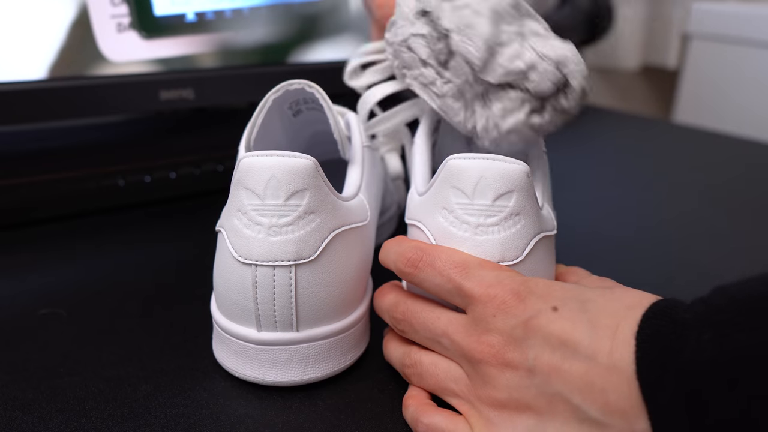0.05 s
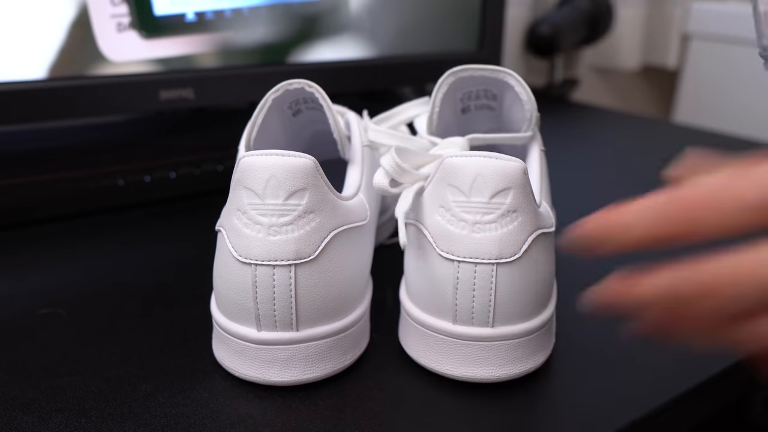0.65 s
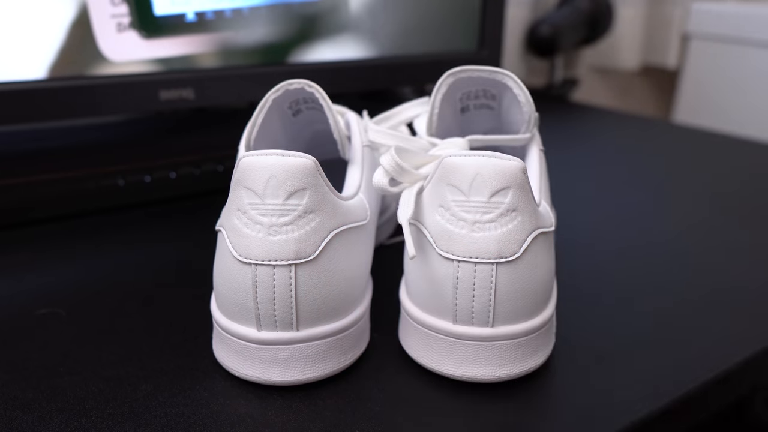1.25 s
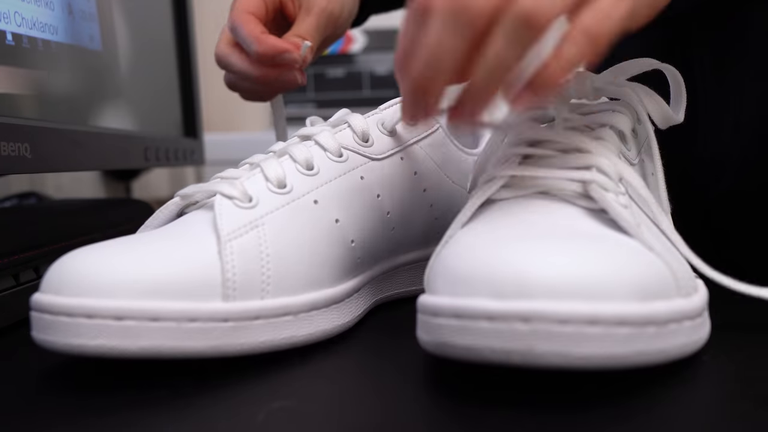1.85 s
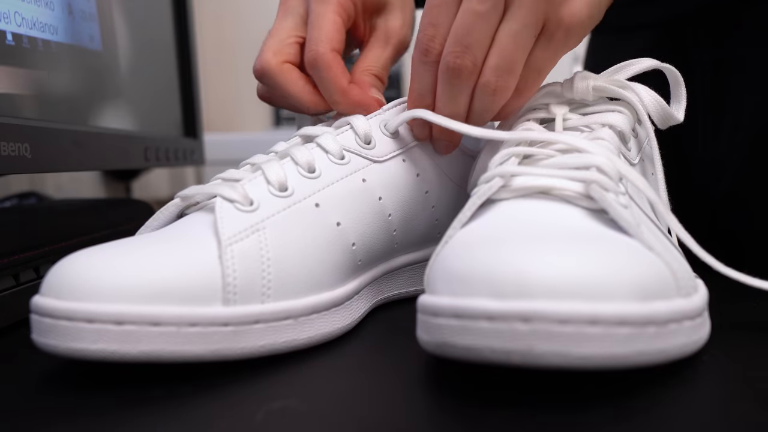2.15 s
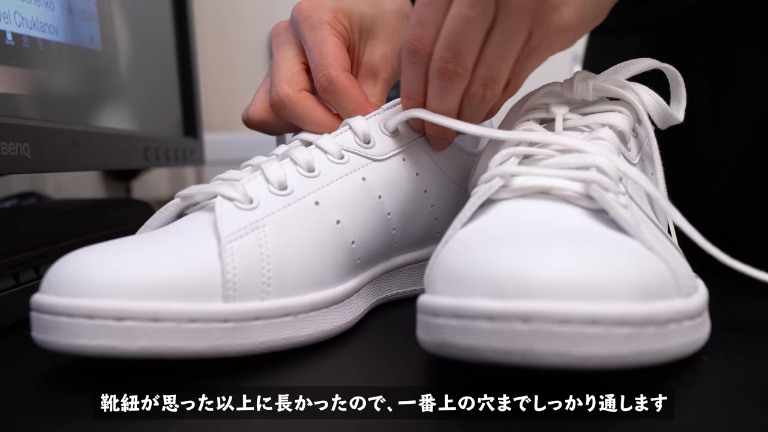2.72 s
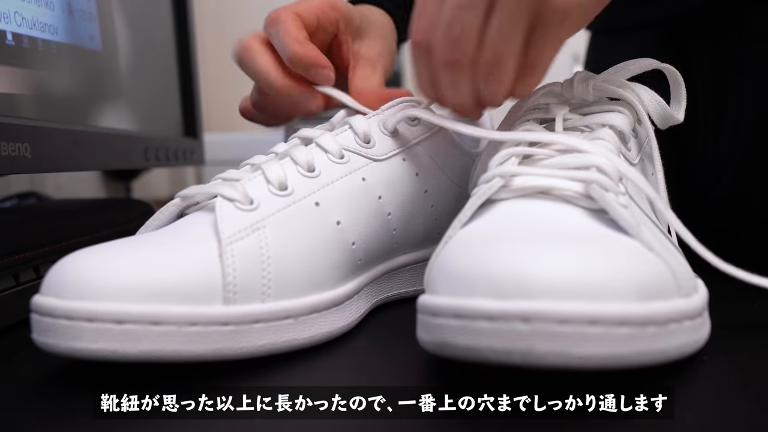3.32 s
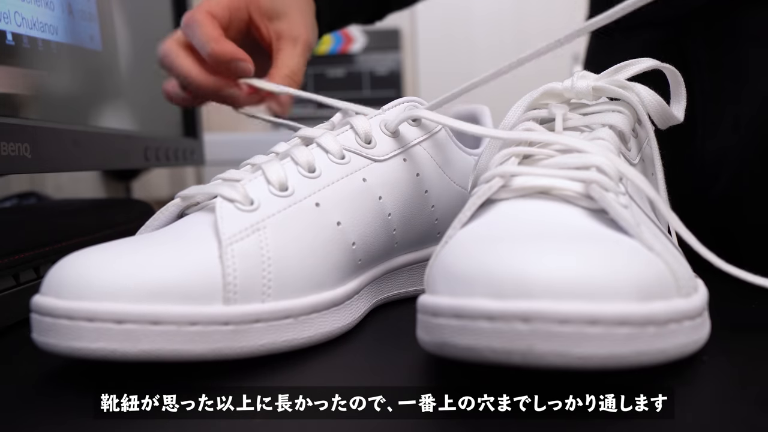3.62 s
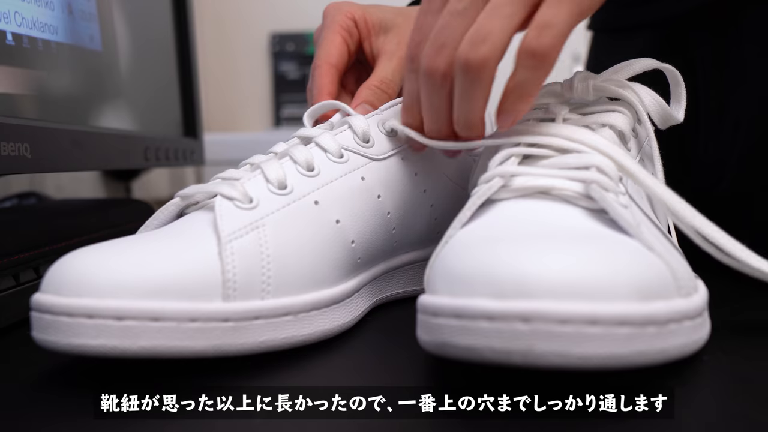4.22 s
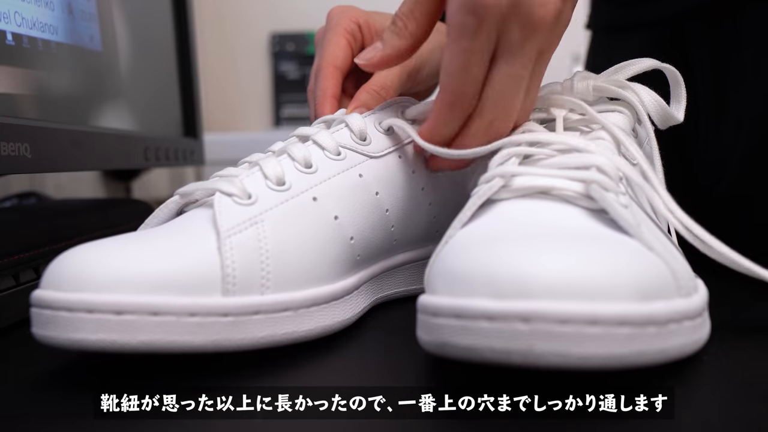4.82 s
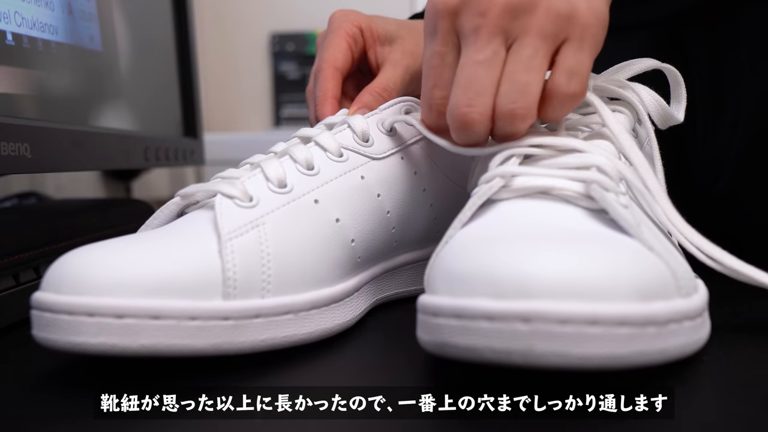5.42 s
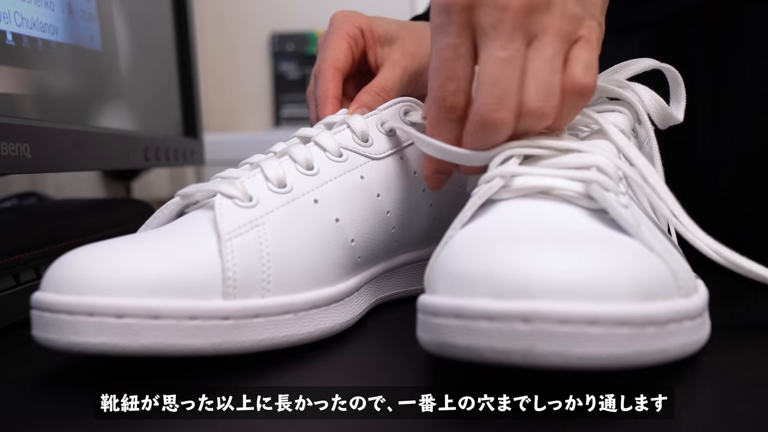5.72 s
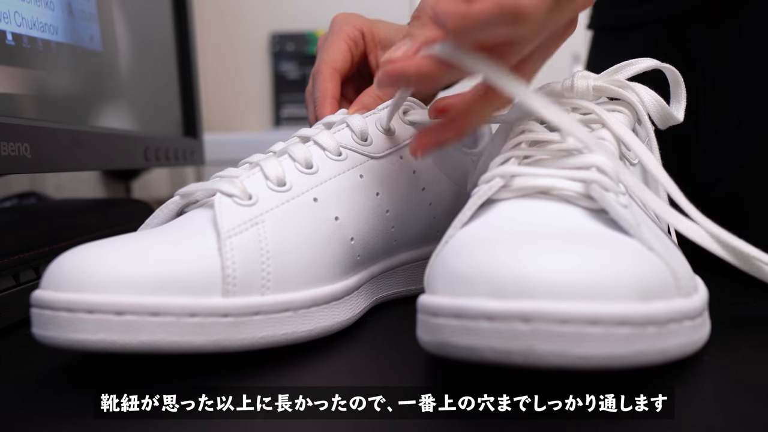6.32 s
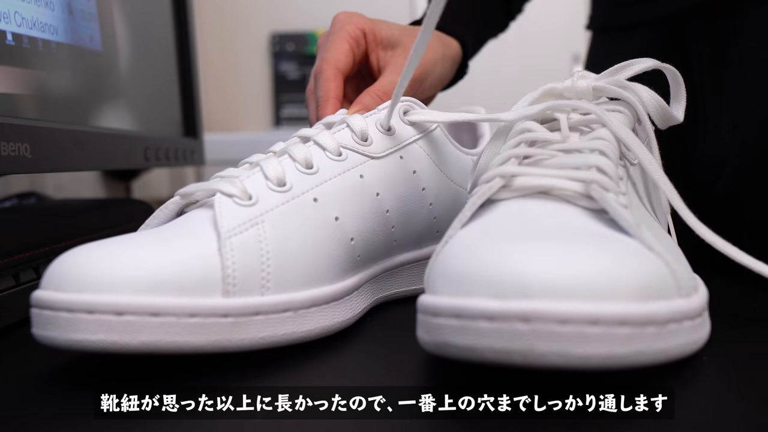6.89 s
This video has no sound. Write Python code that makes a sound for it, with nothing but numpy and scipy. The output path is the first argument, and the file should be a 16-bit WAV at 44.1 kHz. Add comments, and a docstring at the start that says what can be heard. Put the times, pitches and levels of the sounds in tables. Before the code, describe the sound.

Stuffing paper crackles out of a leather shoe, then a lace rasps through eyelets with small taps and low desk thuds.

```python
"""A cotton lace is threaded through a new leather shoe, close to a microphone on a desk.
First, crumpled stuffing paper is pulled out and scrunched, and its creases crackle. Then the lace rubs
on the leather and rasps through the eyelets (the lace holes). Its hard tip and the fingers tap on the
hollow shoe, and the hands make the desk sway and thud. A quiet room hums behind it all."""
import sys
import numpy as np
from scipy import signal
from scipy.fft import rfft, irfft
from scipy.io import wavfile
from scipy.ndimage import uniform_filter1d

SR = 44100
rng = np.random.default_rng(int(sys.argv[2]) if len(sys.argv) > 2 else 0)


def master_out(mix):
    """Clip the mix to full scale and print it as 16-bit PCM to the path in sys.argv[1]."""
    frames = np.transpose(np.atleast_2d(mix))
    ceiling = np.clip(frames, -1, 1)
    pcm = np.round(ceiling * 32767).astype(np.int16)
    wavfile.write(sys.argv[1], SR, pcm)


N = 315315

# the bright tone of a tiny click, for paper snaps and taps: (frequency [Hz], relative level [dB])
TICK_TONE = [(2500, -28), (5500, 14.5), (10000, 10.5), (16000, 0.5)]


def undb(db):
    """Turn decibels into a number to multiply by."""
    return 10 ** (np.asarray(db) / 20)


def unit(x):
    """Scale a signal so that its average size (rms) is 1."""
    return x / np.sqrt(np.mean(x ** 2))


def curves(table):
    """Join a table's timed points with straight lines: one curve for each column after the time."""
    times, *columns = np.transpose(table)
    return [np.interp(np.arange(N) / SR, times, column) for column in columns]


def noise():
    """White noise: an even hiss."""
    return rng.standard_normal(N)


def drift(rate, size=8192):
    """A smooth random wobble of about size 1 that heads for a new value `rate` times a second."""
    hold = max(int(SR / rate), 1)
    steps = np.repeat(np.resize(rng.standard_normal(size), N // hold + 1), hold)
    return unit(uniform_filter1d(steps, hold)[:N])


def colour(x, tone, size=1024):
    """Shape a sound's lows and highs to follow a list of (frequency [Hz], level [dB]) points."""
    hz, db = np.transpose(tone)
    grid_hz = np.maximum(np.arange(size // 2 + 1) * SR / size, 1)
    gains = undb(np.interp(np.log(grid_hz), np.log(hz), db))
    # build the filter so that nothing sounds ahead of the click that causes it
    cepstrum = irfft(np.log(gains))
    cepstrum[1:size // 2] *= 2
    cepstrum[size // 2 + 1:] = 0
    return signal.fftconvolve(x, irfft(np.exp(rfft(cepstrum))))[:len(x)]


def resonate(x, hz, width):
    """Ring at one pitch; a smaller width (in Hz) rings longer."""
    return signal.lfilter(*signal.iirpeak(hz, hz / width, fs=SR), x)


def resonate_twice(x, hz, width):
    """Ring twice over, so that less gets through away from the pitch."""
    return resonate(resonate(x, hz, width), hz, width)


def ring(x, modes):
    """An object rings at several pitches of its own, called modes."""
    return sum(undb(db) * resonate(x, hz, width) for hz, width, db in modes)


def band(x, lo_hz, hi_hz):
    """Keep the frequencies between two edges."""
    return signal.sosfilt(signal.butter(2, [lo_hz, hi_hz], "band", fs=SR, output="sos"), x)


def grains(rate, spread_db):
    """Tiny clicks, about `rate` a second: many small ones and a few large."""
    sizes = undb(spread_db * np.minimum(rng.exponential(size=N), 6))
    return unit((rng.random(N) < rate / SR) * sizes * rng.choice([-1, 1], N))


def strokes(table, attack_s, release_s, rest_db):
    """A loudness curve per level column: each stroke rises, holds and fades; brief ones do so faster."""
    t = np.arange(0, N + 64, 64) / SR
    power = np.outer(undb(rest_db) ** 2, np.ones(len(t)))
    for start, end, *db in table:
        length = max(end - start, .005)
        rise = np.clip((t - start) / min(attack_s, .7 * length), 0, 1)
        fall = np.exp(-np.maximum(t - end, 0) / min(release_s, length / 2))
        power = power + np.outer(undb(db), rise * fall) ** 2
    return [np.interp(np.arange(N) / SR, t, np.sqrt(p)) for p in power]


def contact(scuff_ms, size=4096):
    """Two surfaces touch: a burst of tiny slips dies away, with a faint rustle after it."""
    ms = np.arange(size) * 1000 / SR
    fade = np.exp(-ms / max(scuff_ms, .1)) + 0.019 * np.exp(-ms / 6.0)
    return rng.choice([-1, 1], size) * fade


def hit_level(x, db):
    """Scale a hit so that its first 10 ms have the given level."""
    return x * undb(db) / np.std(x[:SR // 100])


def paper(stop_s=1.341):
    """Creases buckle in dense showers while the sheets slide over each other; the sound stops short."""
    # grips, pulls and scrunches: (start [s], end [s], rustle [dB], crackle [dB])
    scrunches = [(-.03, .04, -31.5, -39.5), (.03, .13, -35, -40), (.225, .3, -32, -33.5),
                 (.43, .54, -37.5, -43), (.115, .225, -26.5, -30.5), (.29, .435, -25.5, -29.5),
                 (.525, .635, -31, -36.5), (.74, .93, -41, -44.5), (.813, .834, -30, -25),
                 (.845, .864, -26.5, -47), (.92, 1.13, -27, -31), (1.12, 1.335, -29, -34.5)]
    # the tones of the rustle and of the high crackle: (frequency [Hz], relative level [dB])
    rustle_tone = [(180, -19.5), (330, -5.5), (800, -2.5), (1400, 2), (1950, -4), (2700, -0.5),
                   (5000, -2.5), (7000, -17.5), (11000, -45)]
    crackle_tone = [(3500, -36), (6500, 2.5), (8500, 2), (13000, 2.5), (16000, -7)]
    # single creases that snap: (time [s], level [dB])
    snaps = [(0.0345, -33.5), (.2945, -33), (.298, -34), (.309, -31), (0.353, -35), (0.523, -32.5),
             (0.5643, -28), (.801, -36), (.951, -31), (.9855, -32.5), (1.0762, -25)]
    rustle_gain, crackle_gain = strokes(scrunches, attack_s=0.024, release_s=0.023, rest_db=(-47, -52))
    # large folds click from low to high; small flat patches each rattle at a pitch of their own
    folds = grains(rate=2200, spread_db=3.0) * undb(1.6 * drift(rate=120))
    patch_hz = np.geomspace(350, 14000, 9)
    patches = sum(resonate(noise() * undb(2.8 * drift(rate=110)), hz, hz / 3) for hz in patch_hz)
    creases = unit(0.82 * folds + unit(patches))
    sound = unit(colour(creases, rustle_tone)) * rustle_gain
    sound += unit(colour(creases, crackle_tone)) * crackle_gain
    for s, db in snaps:
        snap = colour(contact(scuff_ms=0.26), TICK_TONE)
        i = int(s * SR)
        sound[i:i + len(snap)] += hit_level(snap, db)
    return sound * np.clip((stop_s - np.arange(N) / SR) / 0.0047, 0, 1)


def room(air_db):
    """Soft ventilation noise and a low hum."""
    # the tone of the moving air: (frequency [Hz], relative level [dB])
    air_tone = [(25, 12.5), (70, 1.5), (120, -5), (250, 0), (500, -7.5), (760, -9), (1000, -7),
                (1350, -12.5), (2000, -17), (4000, -30), (8000, -31), (13000, -38), (16000, -63)]
    # the steady notes of the hum: (pitch [Hz], level [dB])
    hum_notes = [(49.3, -38), (99, -51)]
    t = np.arange(N) / SR
    hum = sum(np.sqrt(2) * undb(db) * np.sin(2 * np.pi * (hz * t + rng.random())) for hz, db in hum_notes)
    air = unit(colour(noise(), air_tone, size=4096))
    return air * undb(air_db + .5 * drift(rate=6.9)) + hum


def echo(x, fade_s, level_db):
    """The short echo of a small furnished room; it falls by 60 dB in `fade_s`."""
    # the tone of the echo: (frequency [Hz], relative level [dB])
    echo_tone = [(100, -38), (400, 4.5), (1200, 7.5), (4000, 5), (16000, 6.5)]
    t = np.arange(SR // 2) / SR
    reflections = noise()[:len(t)] * np.exp(-np.log(1000) * t / fade_s) * np.clip(t / 0.006, 0, 1)
    tail = colour(reflections, echo_tone)
    return signal.fftconvolve(x, tail / np.linalg.norm(tail))[:N] * undb(level_db)


def desk():
    """The desk sways, rumbles and thuds under the hands and shakes the microphone."""
    # the hands lean on the desk: (start [s], end [s], sway [dB])
    leans = [(.05, .25, -22.5), (1.25, 2.1, -18), (2.35, 2.65, -14), (2.98, 3.17, -15.5), (3.47, 3.72, -14),
             (4.75, 5.58, -15), (5.9, 6.42, -11.5)]
    # the shoe is shoved over the desk: (start [s], end [s], rumble [dB], thud [dB])
    shoves = [(1.09, 1.27, -42, -34), (1.42, 1.57, -15, -26), (1.78, 1.98, -30, -42),
              (2.14, 2.25, -24, -30.5), (2.6, 2.7, -31, -37), (3.08, 3.25, -26.5, -40),
              (3.39, 3.59, -19.5, -34), (3.77, 3.93, -28, -46), (4.08, 4.18, -38, -37),
              (4.75, 4.85, -32, -35), (4.85, 4.97, -21.5, -26), (5.78, 6.29, -30.5, -35),
              (6.75, 6.84, -34, -39)]
    # the desk's three ways of shaking: (frequency [Hz], width [Hz], relative level [dB])
    sway_modes = [(14.87, 4.67, 0)]
    rumble_modes = [(42.05, 13.6, 0)]
    thud_modes = [(62.9, 7.9, 3), (96.2, 32, -3.5), (131, 25, -12), (194, 50, -17.5)]
    sway, = strokes(leans, attack_s=0.12, release_s=.12, rest_db=(-23,))
    rumble, thud = strokes(shoves, attack_s=0.028, release_s=0.051, rest_db=(-37, -45))
    out = 0
    for modes, gain in ((sway_modes, sway), (rumble_modes, rumble), (thud_modes, thud)):
        push = noise()
        motion = sum(undb(db) * resonate_twice(push, hz, width) for hz, width, db in modes)
        # even out chance swells, so that the hands set how strong the motion is
        power = np.abs(signal.hilbert(motion)) ** 2 / 2
        strength = np.sqrt(uniform_filter1d(power, int(.12 * SR)))
        out = out + motion / strength * gain
    return out


def taps(size=4096):
    """Each tap knocks the hollow shoe; hard ones add a clack and a bright tick."""
    # paper, lace tip, fingers and sole hit the shoe:
    # (time [s], knock [dB], rough pitch of the knock [Hz], clack [dB], tick [dB])
    hits = [(0.612, -36, 1210, -28.5, -29), (.856, -32, 1400, -36, -35), (1.261, -30, 1150, -26.5, -40),
            (1.435, -13.5, 570, -52, -36), (1.4535, -50, 830, -24, -25.5), (1.5012, -37, 700, -34.5, -36.5),
            (2.09, -32.5, 475, -67, -64), (2.255, -33, 705, -35, -39), (2.458, -27, 547, -43.5, -44.5),
            (2.485, -26.5, 700, -38.5, -45), (2.525, -43, 1000, -37.5, -37), (2.676, -27.5, 537, -40, -37),
            (2.779, -21, 453, -41, -58), (3.096, -26, 770, -48, -58), (3.126, -30, 910, -47, -53),
            (4.06, -40, 644, -43.5, -51), (4.139, -29, 1180, -34.5, -35), (4.1675, -46, 1150, -32.5, -32.5),
            (4.369, -25, 880, -57, -40), (4.856, -26.5, 407, -55, -56), (4.871, -25.5, 465, -41.5, -47),
            (4.91, -23.5, 596, -42, -45.5), (4.938, -28, 905, -34, -33.5), (5.81, -26, 815, -28, -59),
            (5.823, -26, 420, -60, -51), (5.953, -30.5, 930, -44, -43.5), (5.965, -31.5, 576, -46, -69),
            (6.073, -26.5, 710, -42.5, -44), (6.188, -26, 644, -60, -63), (6.201, -20.5, 810, -30.5, -29.5),
            (6.529, -33, 484, -52, -46), (6.566, -18, 685, -34, -38), (6.757, -42, 616, -38, -46)]
    # the hollow shoe when knocked: (pitch [Hz], width [Hz], relative level [dB])
    shoe_modes = [(306, 182, -0.5), (463, 186, 5.5), (640, 310, 0.5), (976, 112, 6.5), (1460, 270, -8),
                  (1770, 57, 3)]
    # the tone of the clack: (frequency [Hz], relative level [dB])
    clack_tone = [(700, 0), (1600, -1.5), (2700, 0.5), (4200, -5), (6000, -8.5), (10000, -24.5)]
    out = np.zeros(N + size)
    for s, knock_db, knock_hz, clack_db, tick_db in hits:
        # harder taps are shorter: 47 dB more clack halves the scuff
        hardness = (clack_db + 40) / 47
        scuff = contact(scuff_ms=2.03 / 2 ** hardness)
        # every spot on the shoe rings a little differently
        modes = [(hz * np.exp(.04 * rng.standard_normal()), width, db) for hz, width, db in shoe_modes]
        push = signal.unit_impulse(size) + 0.012 * scuff
        # neighbouring modes swing opposite ways, which spreads the blow in time
        knock = ring(push, modes[::2]) - ring(push, modes[1::2])
        # softer taps reach only the low modes
        knock = band(knock, knock_hz * 0.45, knock_hz * 1.185)
        clack = hit_level(colour(scuff, clack_tone), clack_db)
        tick = hit_level(colour(scuff, TICK_TONE), tick_db)
        i = int(s * SR)
        out[i:i + size] += hit_level(knock, knock_db) + clack + tick
    return out[:N]


def lace_tip(size=4096):
    """The stiff tip of the lace strikes, rings briefly, then rattles as it settles."""
    # strikes of the tip: (time [s], pitch [Hz], level [dB])
    strikes = [(.6102, 2690, -21.5), (4.1402, 1450, -26.5), (5.8102, 1950, -28.5), (6.5672, 1290, -17)]
    out, t = np.zeros(N + size), np.arange(size) / SR
    for s, hz, db in strikes:
        rattle = 0.0083 * rng.choice([-1, 1], size) * np.exp(-t / 0.023)
        ping = resonate_twice(signal.unit_impulse(size) + rattle, hz, width=0.58 * hz)
        i = int(s * SR)
        out[i:i + size] += hit_level(ping, db)
    return out[:N]


def friction():
    """Loudness curves for shoe body, scrape and hiss: fingers mostly sound the shoe, the lace hisses."""
    # fingers rub the shoe: (start [s], end [s], shoe body [dB], scrape on leather [dB])
    finger_rubs = [(1.39, 1.445, -41, -38.5), (2.09, 2.135, -35.5, -42), (2.23, 2.355, -41, -50.5),
                   (2.38, 2.86, -40.5, -57.5), (2.785, 3.08, -44, -57), (3.115, 3.142, -31, -57),
                   (3.16, 3.26, -36.5, -54), (3.28, 3.33, -36, -48.5), (3.325, 3.385, -31.5, -39),
                   (4.052, 4.09, -40.5, -46.5), (4.155, 4.2, -44, -40.5), (4.25, 4.55, -44.5, -50),
                   (4.34, 4.372, -31, -43), (4.735, 4.81, -41.5, -51), (4.86, 4.925, -38.5, -54),
                   (5.82, 6.13, -42.5, -51.5), (6.125, 6.185, -30.5, -40.5), (6.26, 6.5, -45, -57.5),
                   (6.57, 6.6, -30.5, -51)]
    # the lace slides: (start [s], end [s], hiss of its fibres [dB])
    lace_slides = [(1.48, 1.72, -59), (1.755, 1.85, -49.5), (2.14, 2.3, -54), (2.42, 2.65, -51),
                   (2.76, 2.9, -51.5), (3.175, 3.215, -52), (3.335, 3.5, -38), (3.5, 3.6, -42),
                   (3.6, 3.885, -39), (4.21, 4.265, -52), (4.35, 4.44, -49.5), (4.43, 4.555, -42),
                   (4.71, 4.82, -47.5), (5.15, 5.245, -49), (5.67, 6.13, -51.5), (6.13, 6.18, -52),
                   (6.27, 7.12, -47), (6.45, 6.76, -42)]
    body, scrape = strokes(finger_rubs, attack_s=0.032, release_s=0.01, rest_db=(-53, -58.5))
    hiss, = strokes(lace_slides, attack_s=0.076, release_s=0.043, rest_db=(-67,))
    grip = undb(drift(rate=51))  # the grip is never quite steady
    body, scrape = body * grip, scrape * grip
    # a slide also brings some body and scrape, and a finger rub some hiss
    return (np.hypot(body, hiss * undb(-2.5)),
            np.hypot(scrape, hiss * undb(-7)),
            np.hypot(hiss, scrape * undb(-6.5)))


def lace():
    """Cotton fibres catch and slip; lace and fingers hiss, scrape the leather and ring the shoe."""
    # the hollow shoe when rubbed: (pitch [Hz], width [Hz], relative level [dB])
    shoe_modes = [(335, 114, 2), (478, 70, 5.5), (670, 530, -6), (959, 90, -1)]
    # the tones of the leather's scrape and the fibres' hiss: (frequency [Hz], relative level [dB])
    scrape_tone = [(700, -45), (1500, 5), (2700, 6.5), (4300, 5.5), (6000, -4.5), (9000, -30.5)]
    hiss_tone = [(3500, -35), (6000, -4), (7600, 2.5), (9500, 2), (11500, 4), (14000, 1.5), (16000, -5)]
    # the lace runs tight through an eyelet: (start [s], end [s], share of ring [0-1], pitch [factor])
    tight_pulls = [(3.364, 3.965, 0.57, 0.95), (4.24, 4.58, 0.67, 0.93)]
    t = np.arange(N) / SR
    body_gain, scrape_gain, hiss_gain = friction()
    catches = grains(rate=2300, spread_db=1.5)
    slips = unit(catches + 3.8 * noise()) * undb(1.43 * drift(rate=160))
    fingers = unit(grains(rate=660, spread_db=2.5) + 2.04 * noise())
    body = unit(band(ring(fingers, shoe_modes), 165, 1370)) * body_gain
    rub = unit(colour(slips, scrape_tone)) * scrape_gain + unit(colour(slips, hiss_tone)) * hiss_gain
    for start, end, share, pitch in tight_pulls:
        pulling = np.clip(np.minimum(t - start, end - t) / .03, 0, 1)
        tight_rub = 0.79 * (rub + eyelet(rub, pitch))
        rub = rub + share * pulling * (tight_rub - rub)
        body = body * (1 - 0.16 * pulling)  # a tight lace scuffs the shoe less
    rub = rub + last_pull_zip(width_hz=4100)
    return body + braid_rasp() + desk_reflection(rub)


def sole_bumps():
    """The rubber sole lands softly and the desk top booms."""
    # the sole meets the desk: (time [s], relative level [dB])
    landings = [(1.455, -15), (1.516, -36), (3.411, -21.5), (3.517, -26.5), (6.77, -31.5)]
    # the desk top's ring: (pitch [Hz], width [Hz], relative level [dB])
    desk_modes = [(45.4, 3.6, 11), (94.1, 7.7, 7.5), (131, 8.9, -5), (170, 5.5, -25)]
    boom = band(ring(signal.unit_impulse(SR // 2), desk_modes), 20, 120)
    boom = boom / np.std(boom[:SR // 20])
    blows = np.zeros(N)
    for s, db in landings:
        blows[int(s * SR)] += undb(db - 2.5)
    return signal.fftconvolve(blows, boom)[:N]


def braid_rasp():
    """The lace's woven ridges tick unevenly over the eyelet's rim and set the shoe rasping."""
    # how fast the ridges pass the rim: (time [s], ticks a second [Hz])
    tick_rates = [(3.37, 331), (3.49, 301.8), (3.56, 455.6), (3.63, 387.2), (3.71, 313.3), (3.775, 369.5),
                  (3.82, 311.4), (3.87, 281.5), (3.915, 431)]
    # hard tugs on the lace: (start [s], end [s], level [dB])
    tugs = [(3.36, 3.59, -34), (3.655, 3.71, -31.5), (3.72, 3.925, -34.5)]
    tick_hz, = curves(tick_rates)
    force, = strokes(tugs, attack_s=0.013, release_s=0.022, rest_db=(-100,))
    ridges_passed = np.cumsum(tick_hz * np.exp(0.13 * drift(rate=220))) / SR
    ticks = np.diff(np.floor(ridges_passed), prepend=0) * undb(3.2 * noise())
    rasp = ring(ticks, modes=[(346, 290, -3.5), (935, 110, -5.5)])
    return unit(band(rasp, 243, 590)) * force * undb(1.5 * drift(rate=30))


def eyelet(rub, pitch):
    """The hollows around the eyelet ring; each ring flutters as the lace passes."""
    # the eyelet's rings: (frequency before the pitch factor [Hz], width [Hz], relative level [dB])
    eyelet_modes = [(2810, 650, 3), (4360, 1700, 0.5), (7950, 1800, -2), (11800, 1200, 2.5),
                    (13900, 900, 2), (15500, 1000, 2.5)]
    out = 0
    for hz, width, db in eyelet_modes:
        flutter_db = 2.2 * drift(rate=24)
        out = out + undb(db + flutter_db) * resonate_twice(rub, hz * pitch, width)
    return out


def desk_reflection(rub):
    """As the hand rises, the bounce off the desk comes later, so ripples sweep down through the hiss."""
    # the long last pull rises over the desk: (time [s], delay [ms], strength of the bounce [0-1])
    bounce_path = [(6.25, .3, 0), (6.4, .45, .2), (6.55, .62, .25), (6.75, .82, .28), (6.95, .95, .2),
                   (7.15, 1., .15)]
    t = np.arange(N) / SR
    delay_ms, strength = curves(bounce_path)
    bounce = np.interp(t - delay_ms / 1000, t, rub)
    return (rub + strength * bounce) / np.sqrt(1 + strength ** 2)


def last_pull_zip(width_hz):
    """A band of fibre hiss falls in pitch as the pulled length of lace grows."""
    # the path of the zip: (time [s], middle frequency [Hz], relative level [dB])
    glide = [(6.28, 10600, -73), (6.35, 10000, -66), (6.47, 7830, -47), (6.6, 6900, -41.5),
             (6.7, 5950, -41), (6.77, 5330, -44), (6.84, 4900, -65)]
    hz, db = curves(glide)
    fibres = signal.sosfilt(signal.butter(2, width_hz / 2, fs=SR, output="sos"), noise())
    # multiplying by a tone moves the low noise up to that tone's pitch
    return unit(fibres * np.cos(2 * np.pi * np.cumsum(hz) / SR)) * undb(db - 1.0)


def scene():
    """Paper, lace and taps close by, over the desk's rumble and the room."""
    rubbing = paper() + lace()
    tapping = taps() + lace_tip()
    echoes = echo(rubbing, fade_s=0.073, level_db=-20.0) + echo(tapping, fade_s=0.23, level_db=-11.5)
    return (rubbing + tapping + echoes + sole_bumps() + desk() + room(air_db=-41.0))[None]


def record(dry):
    """The recorder rounds off the tallest peaks and cuts the highest treble."""
    ceiling, top_hz = .85, 16000
    rounded = dry / (1 + (dry / ceiling) ** 10) ** (1 / 10)
    return signal.sosfilt(signal.ellip(10, .2, 80, top_hz, fs=SR, output="sos"), rounded)


dry = scene()
out = record(dry)
master_out(out)
```